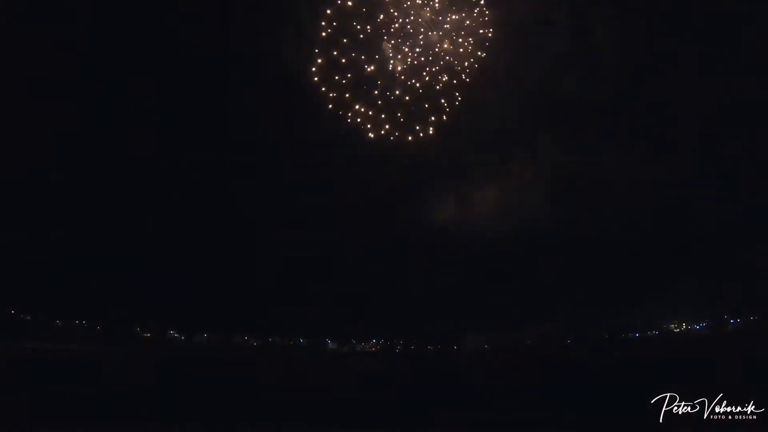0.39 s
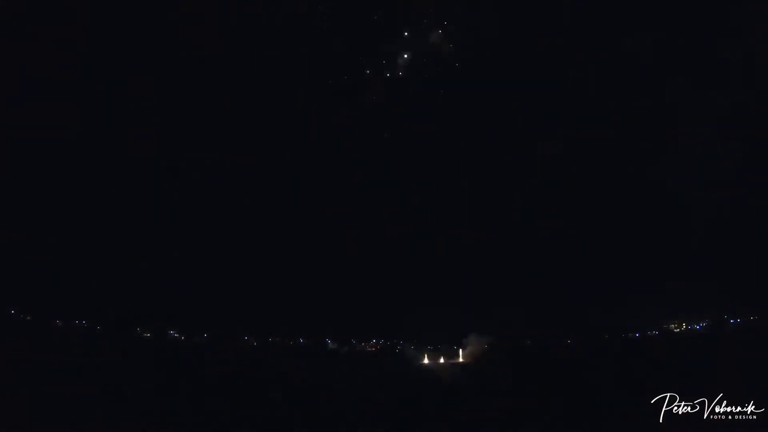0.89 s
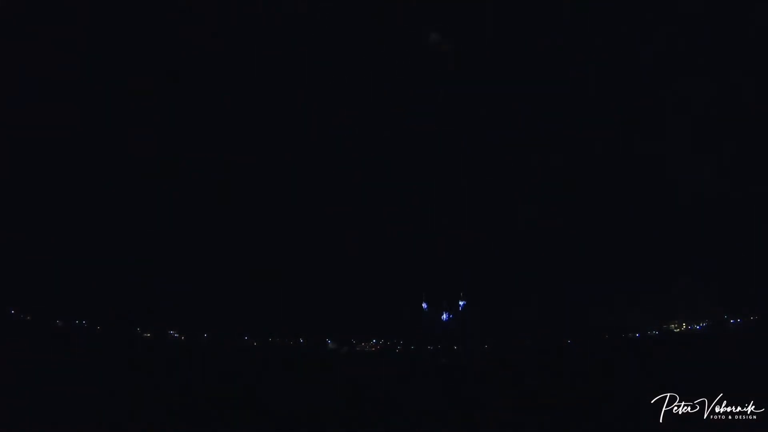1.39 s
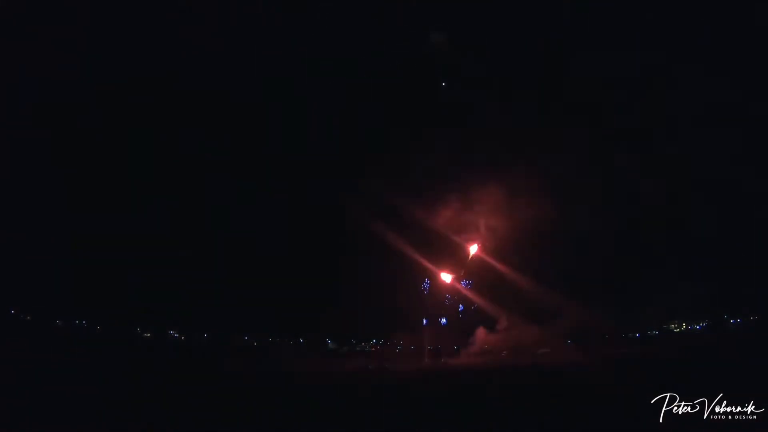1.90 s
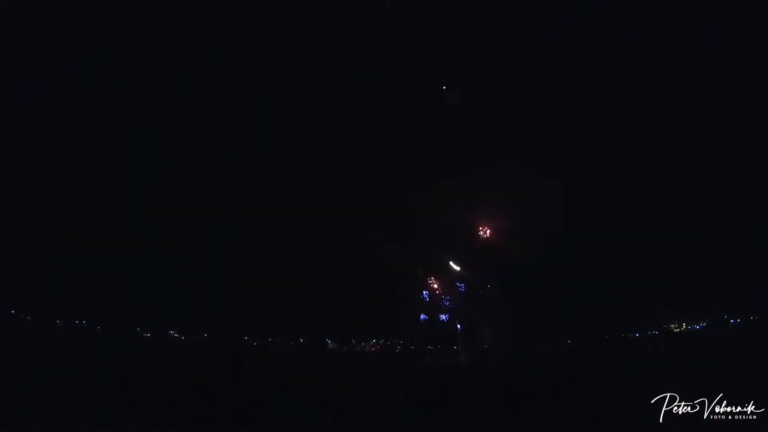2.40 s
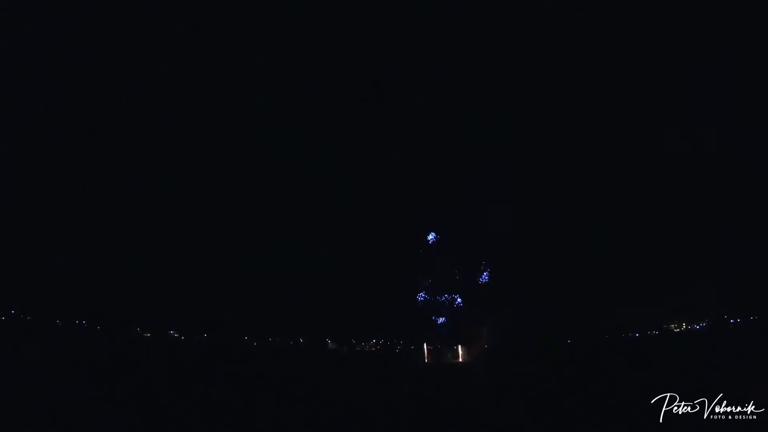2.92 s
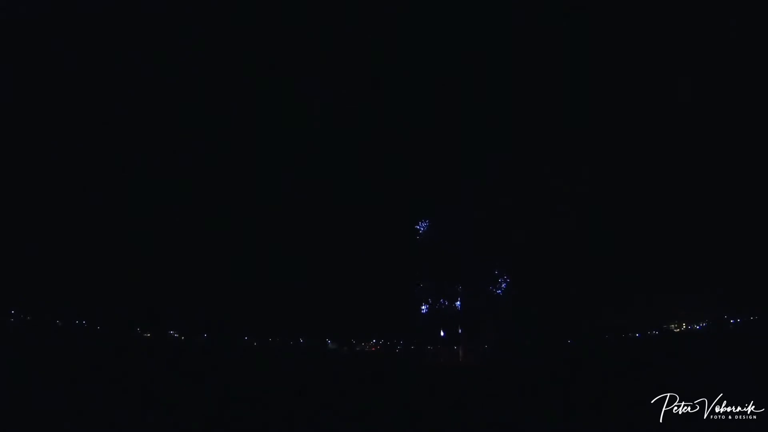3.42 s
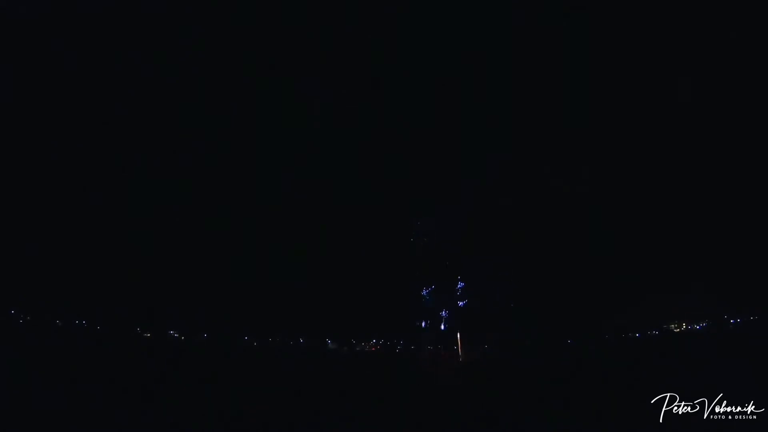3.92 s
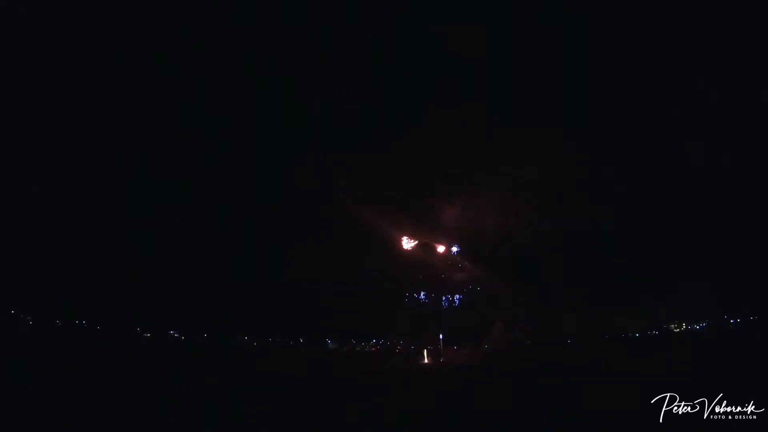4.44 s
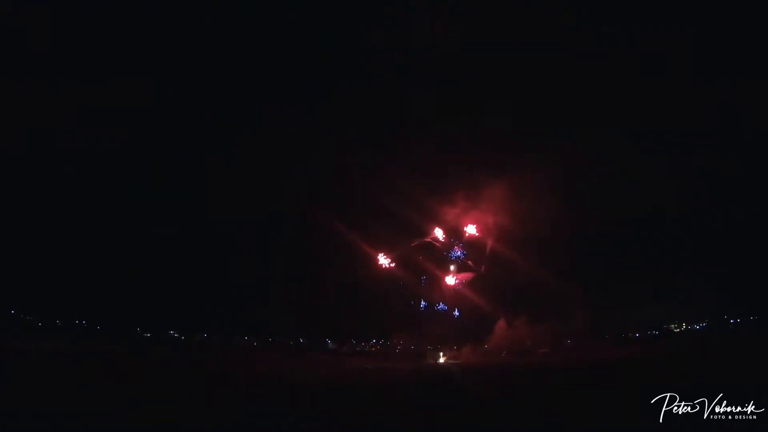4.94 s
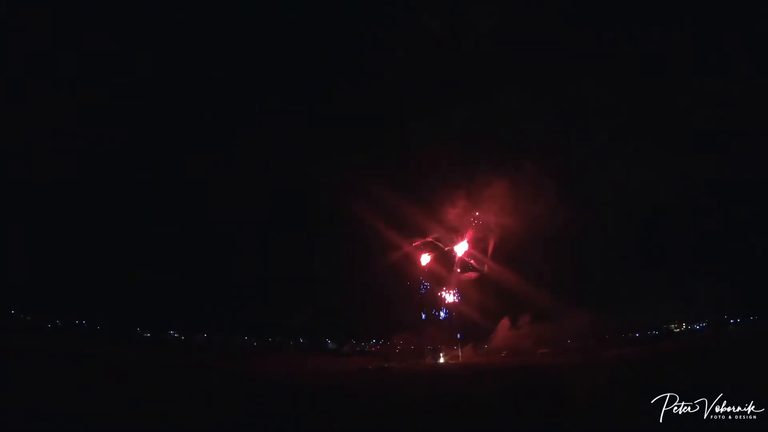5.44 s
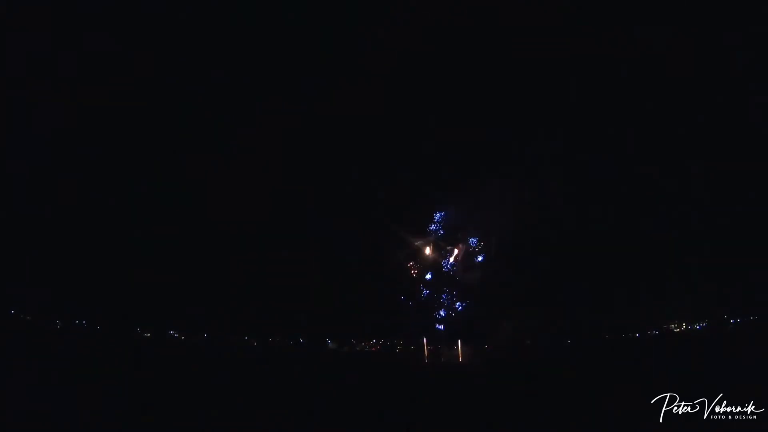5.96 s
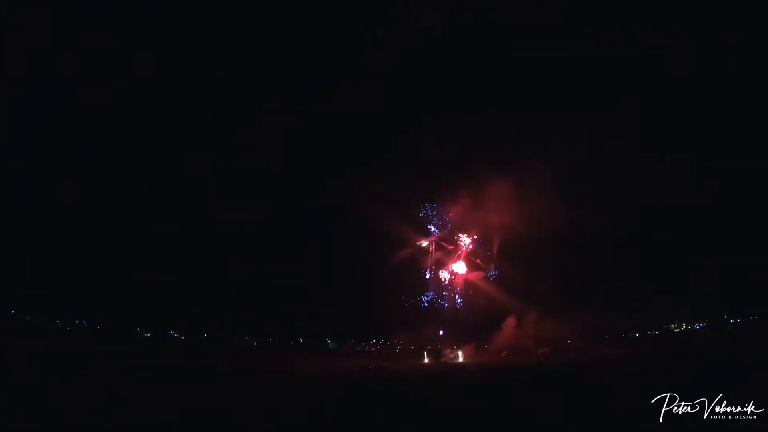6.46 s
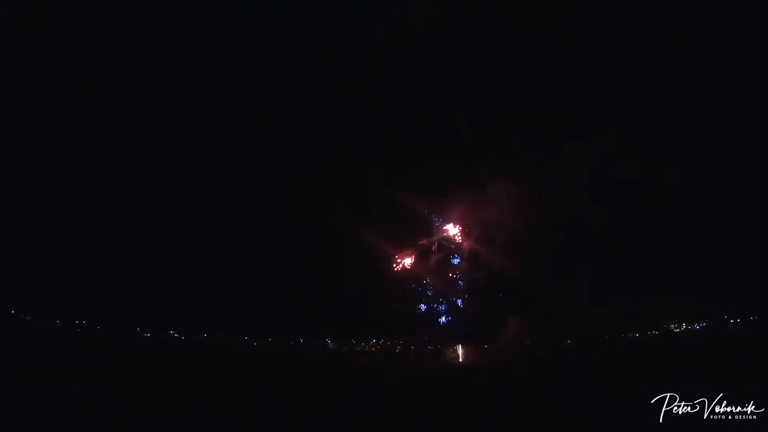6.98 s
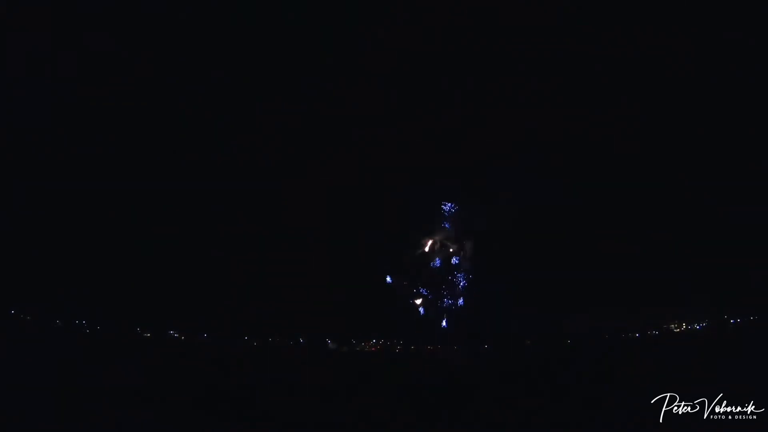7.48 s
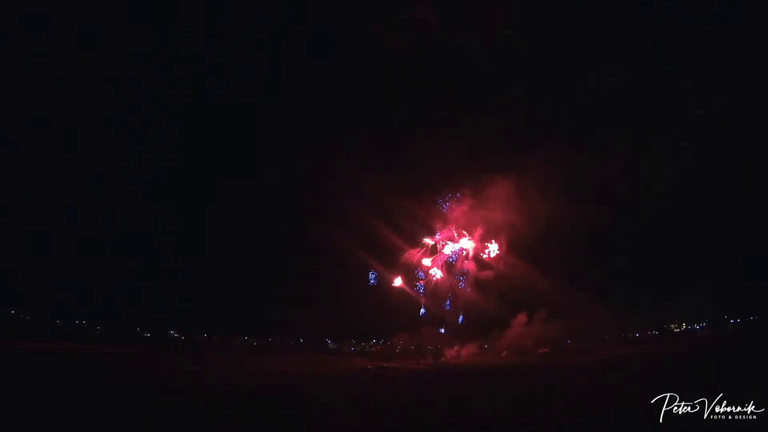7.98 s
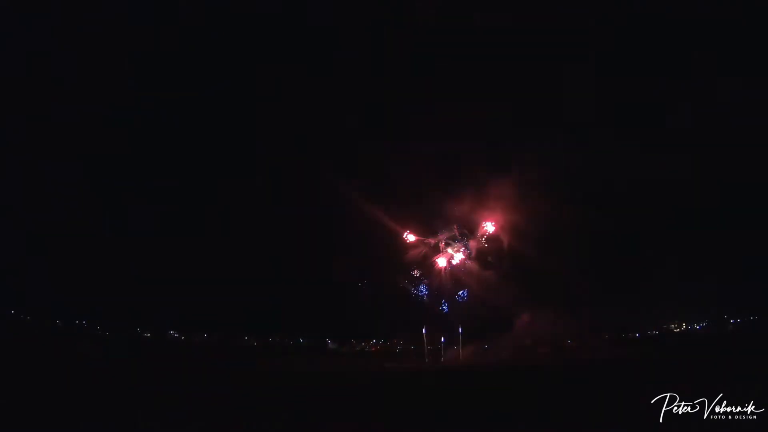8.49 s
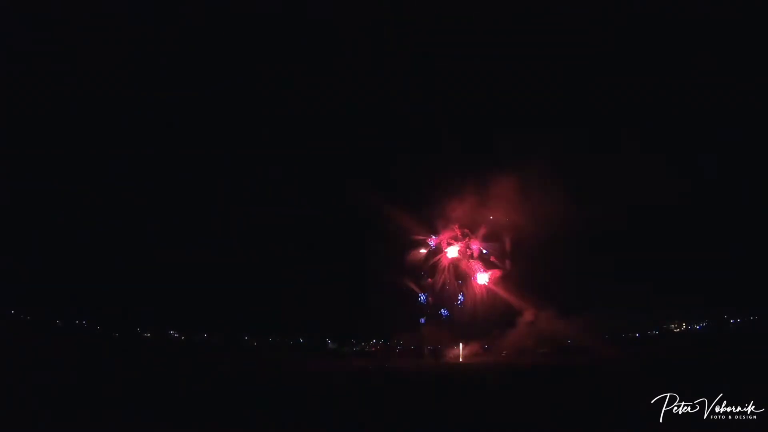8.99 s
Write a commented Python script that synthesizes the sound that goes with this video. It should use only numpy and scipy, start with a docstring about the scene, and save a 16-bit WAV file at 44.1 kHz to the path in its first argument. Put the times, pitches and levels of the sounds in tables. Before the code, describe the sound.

First a low rolling echo and muffled thuds, with small mechanical clicks nearby. Then a burst of hard, dry bangs breaks out, each a bright crack and short thump, slapping back from walls. The firing loosens briefly, then thickens with heavier high bursts toward the end. A continuous rumble and rough crackle fill the open night air; the display sits slightly right in stereo, peaks slightly rounded by the microphone.

```python
"""Fireworks heard across open ground at night: mortars lift and shells burst, several a second.
Each bang joins a sharp crack to a low thump; high bursts add a reflection off the ground.
Shaped noise and short pitched echoes make the crackling, rumbling wash that the town returns.
A small mechanism, likely a camera shutter, ticks as struck modes and whirs as banded noise close
to a stereo microphone; one short squeak is a gliding tone with two overtones."""
import sys
import numpy as np
from scipy import signal
from scipy.fft import rfft, irfft, next_fast_len
from scipy.io import wavfile
from scipy.ndimage import uniform_filter1d

SR = 44100
rng = np.random.default_rng(int(sys.argv[2]) if len(sys.argv) > 2 else 0)


def put_to_file(sound):
    """Save the sound as 16-bit audio at rate SR, in the file named by the first command-line argument."""
    columns = np.atleast_2d(sound).T  # one column per channel
    safe = np.clip(columns, -1, 1)
    whole_steps = np.round(safe * 32767)
    wavfile.write(sys.argv[1], SR, whole_steps.astype(np.int16))


def elevation(decibels):
    """Turn decibel levels (scalar or array-like) into linear amplitude ratios."""
    levels = np.asarray(decibels, float)
    return 10 ** (levels / 20)


N = 402368


def evened(x):
    """Normalisation: scales to rms 1."""
    return x / np.sqrt(np.mean(x ** 2) + 1e-20)


def read(points, hz):
    """Interpolation: reads a table on a log-frequency axis."""
    f, value = np.transpose(points)
    return np.interp(np.log(hz + 1), np.log(f + 1), value)


def add(mix, s, sound):
    """Superposition: mixes a sound in from time s."""
    part = mix[..., round(s * SR):][..., :sound.shape[-1]]
    part += sound[..., :part.shape[-1]]


def coloured(x, points, share=1):
    """Linear filtering: multiplies the spectrum by a gain table."""
    n = next_fast_len(x.shape[-1] + 512)
    hz = np.arange(n // 2 + 1) * SR / n
    return irfft(rfft(x, n) * elevation(share * read(points, hz)), n)[..., :x.shape[-1]]


def sides(pan_db):
    """Level difference between channels: positive is louder on the left."""
    return elevation(np.array([[.5], [-.5]]) * pan_db)


# What never dies away, and far echoes of every bang: one value per range of the wash
# (rumble, hollow middle, crackle, sizzle)
TOWN_DB = (-46.5, -52, -89.5, -83)
MEMORY_DB, MEMORY_T60_S = (-37.5, -67.5, -42, -76.5), (2.65, 1.3, 2.8, 1.1)
# Great shell that burst earlier, echoed from ever farther and duller: (start_s, level_db, t60_s)
SHELL = [(0, -48.5, 5.6), (.21, -43.5, 2.7), (.3, -40, 1.3), (.41, -39.5, 0.81), (.48, -37, 1.37),
         (0.738, -40.5, 3.8), (.85, -42, 3.3), (1.04, -34, 1.1), (1.17, -40, 3.8), (1.5, -25, 1.08),
         (1.79, -40, 22)]
# Its level in each range: [db], and the change with start time
SHELL_DB = (6.5, 1, 0.5, -13.5)
SHELL_DULLS_DB_PER_S, SHELL_RISE_S = (-7.5, -4.5, -30, -85), 0.027
# Echoes of a whole volley rolling in from the town:
# (start_s, crackle_level_db, base_decay_s, sizzle_relative_to_crackle_db)
ROLLS = [(0, -48.5, 0.4, 4.5), (1.426, -25.5, 0.19, -5), (1.501, -35, 0.48, -11),
         (1.571, -37.5, 0.46, -8.5), (1.651, -34.5, 0.52, -15.5), (1.947, -45.5, 1, -44),
         (2.026, -32, 0.58, -12.5), (2.17, -35.5, 1, -15.5), (2.546, -38.5, 0.68, -11),
         (2.62, -43.5, 0.35, -10.5), (2.722, -37.5, 0.84, -13), (2.868, -42.5, 0.29, -17),
         (2.93, -38.5, 0.34, -33), (2.975, -36, 0.52, -22.5), (3.04, -33.5, 0.47, -14),
         (3.214, -40, 0.83, -14), (3.39, -33, 0.21, -8), (3.44, -27.5, 0.15, -5.5),
         (3.515, -39.5, 0.35, -14), (3.591, -42, 0.84, -5.5), (3.709, -34, 0.29, -8.5),
         (3.912, -45.5, 0.76, -20), (4.21, -35.5, 0.39, -6.5), (4.257, -33.5, 0.19, -34),
         (4.335, -34, 1, -14.5), (4.586, -34.5, 0.32, -25), (4.832, -36.5, 0.79, -12.5),
         (4.971, -37.5, 0.64, -9.5), (5.033, -26, 0.12, -11), (5.082, -29.5, 0.18, -13),
         (5.163, -40.5, 0.95, -13), (5.341, -45.5, 0.076, 2), (5.508, -36, 0.37, -11),
         (5.574, -40, 0.91, -9.5), (5.856, -38.5, 0.66, -11), (6.022, -36.5, 0.57, -12.5),
         (6.092, -24, 0.11, -24.5), (6.247, -37.5, 0.43, -10.5), (6.41, -33.5, 0.36, -11),
         (6.5, -42.5, 1, -14), (6.604, -47, 0.22, -3), (6.718, -34, 0.21, -21.5), (6.799, -35.5, 0.41, -12),
         (6.973, -41, 0.11, -5.5), (7.003, -30.5, 0.37, -5.5), (7.152, -35.5, 0.42, -13),
         (7.327, -44, 0.83, -20), (7.515, -42, 0.24, 5), (7.651, -32, 0.12, -8.5),
         (7.686, -32.5, 0.48, -16.5), (8.114, -41, 0.36, -5), (8.228, -35.5, 0.24, -10),
         (8.305, -37.5, 0.33, -7.5), (8.48, -40.5, 0.12, -11.5), (8.52, -34.5, 0.13, -24),
         (8.874, -32.5, 0.35, -8.5), (8.991, -45, 0.67, 0), (9.07, -34.5, 0.34, -31)]
# Rumble and middle against the crackle; factors on the base decay in each range
ROLL_DB, ROLL_LASTS = (5, -9), (0.97, 1.35, 1.234, 0.83)
FRONT_DB, FRONT_T60_S = 5.5, 0.016  # a roll opens with a bright front


def echo_levels():
    """Exponential decay: echoes in four ranges die away and add as powers; returns the gains."""
    t = np.arange(0, N + 32, 32) / SR

    def column(row):
        return np.array(row)[:, None]

    power = elevation(column(TOWN_DB)) ** 2 + 0 * t
    for start, db, t60 in SHELL:
        age = np.maximum(t - start + 1 / SR, 0)
        share_db = column(SHELL_DB) + start * column(SHELL_DULLS_DB_PER_S)
        rise = np.minimum(age / SHELL_RISE_S + (start == 0), 1)
        power = power + rise * elevation(db + share_db - 60 * age / t60) ** 2
    for start, db, decay, sizzle_db in ROLLS:
        age = np.maximum(t - start, 0)
        share_db = column((*ROLL_DB, 0, sizzle_db))
        fall_db = 60 * age / (decay * column(ROLL_LASTS))
        power = power + np.minimum(age / 0.0021, 1) ** 2 * elevation(db + share_db - fall_db) ** 2
        power[3] += (age > 0) * elevation(db + sizzle_db + FRONT_DB - 60 * age / FRONT_T60_S) ** 2
    for start, *_, thump_db, _, _ in reports():
        age = np.maximum(t - start, 0)
        level_db = thump_db + column(MEMORY_DB) - 60 * age / column(MEMORY_T60_S)
        power = power + np.minimum(age / 0.028, 1) * elevation(level_db) ** 2
    return [np.interp(np.arange(N) / SR, t, np.sqrt(p)) for p in power]


# Spectral shapes of the two upper ranges: (frequency_hz, gain_db)
CRACKLE = [(700, -5), (1300, 7), (2000, 11), (3600, 6.5), (4600, -6), (5600, -45.5), (7000, -58.5)]
SIZZLE = [(3500, -5.5), (4500, 1.5), (6500, -7.5), (8000, -17.5), (9500, -37.5)]
POPS_PER_S, POPS_DB = 300, -3  # small single echoes inside the crackle
SPITS_DB = -4  # their bright edges inside the sizzle


def pops():
    """Random impulses through resonances: echoes of a few milliseconds and rough pitch; a few are large."""
    t, out = np.arange(-300, 600) / SR, np.zeros((2, N))
    size = elevation(4.5 * np.minimum(rng.exponential(1, N), 3)) * (rng.random(N) < POPS_PER_S / SR)
    kind = rng.integers(0, 9, N)
    pitches = np.geomspace(900, 3900, num=9)
    for k, (hz, rough) in enumerate(zip(pitches, rng.standard_normal((9, len(t))))):
        waver = evened(uniform_filter1d(rough, size=30))
        swing = np.sin(2 * np.pi * hz * t + 1.26 * waver)
        echo = swing * np.exp(np.minimum(t / 0.00096, -t / 0.0028))
        out += signal.oaconvolve(size * (kind == k), echo)[:N] * sides(3.3 * rough[0])
    edges = signal.oaconvolve(size, rng.standard_normal(len(t)) * np.exp(-abs(t) / .0008))[:N]
    dull = elevation(POPS_DB) * evened(coloured(out, CRACKLE))
    bright = elevation(SPITS_DB) * evened(coloured(edges, SIZZLE))
    return dull, bright


# Spectral shapes of the two lower ranges: (frequency_hz, gain_db)
RUMBLE = [(15, -37), (25, -16), (82, 3.5), (119, -7.5), (210, 5), (353, -18), (450, -16.5), (580, -48.5),
          (990, -120)]
MIDDLE = [(250, -18), (450, 7), (900, 3.5), (1500, -2.5), (2300, -11.5), (3600, -34.5), (5000, -60.5)]
# Coherence of left and right: (frequency_hz, likeness [0 to 1])
SAME = [(60, 0.57), (180, 0.92), (550, 0.91), (1650, 0.47), (4970, 0.58), (15000, 0.12)]


def wash():
    """Diffuse field: noise for countless far echoes, in lumps that last longer in the lower ranges."""
    frames, hz = N // 128 + 5, np.fft.rfftfreq(512, 1 / SR)
    same, out = np.clip(read(SAME, hz), 0, 1)[:, None], 0
    # clumps of echoes that land in all ranges at once
    slaps = evened(uniform_filter1d(rng.exponential(1, frames) ** 2 - 2, size=4))
    levels = echo_levels()
    # old, faint echoes run together: the lumps flatten
    crackle_level = np.interp(np.arange(frames) * 128, np.arange(N), levels[2])
    fresh = np.clip(3.9 + np.log10(crackle_level) * 1.3, .2, 1)
    colours = (RUMBLE, MIDDLE, CRACKLE, SIZZLE)
    lump_frames = (8, 5, 3, 3)
    lumpiness_db, slaps_db = (3.5, 2.8, 3.3, 3.6), (1.1, 1.6, 2.2, 2.4)
    for level, colour, lump, lumpy_db, slap_db in zip(levels, colours, lump_frames, lumpiness_db, slaps_db):
        a, b, c, d, patches = rng.standard_normal((frames, 257, 5)).T
        patches = uniform_filter1d(patches, size=8, axis=0)  # across frequency
        patches = evened(uniform_filter1d(patches, size=lump, axis=1))  # along time
        left = a + 1j * b
        right = same * left + np.sqrt(1 - same ** 2) * (c + 1j * d)
        z = np.array([left, right])
        lumps_db = fresh * (lumpy_db * patches + slap_db * np.minimum(slaps, 2))
        z *= elevation(read(colour, hz)[:, None] + lumps_db)
        noise = evened(signal.istft(z, nperseg=512, noverlap=384)[1][:, :N])
        out = out + noise * level
    dull, bright = pops()
    return out + fresh[np.arange(N) // 128] * (levels[2] * dull + levels[3] * bright)


# Short ringing echoes, as from fences or stepped walls:
# (peak_s, level_db, pitch_hz, half_length_s [peak to 1/e])
PINGS = [(0.43, -34, 864, 0.0059), (0.493, -32, 924, 0.0089), (0.522, -33.5, 710, 0.0057),
         (0.903, -30, 710, 0.0023), (1.066, -34.5, 1410, 0.0037), (1.077, -29, 630, 0.0037),
         (1.559, -29.5, 685, 0.012), (1.803, -29, 654, 0.0055), (1.851, -25.5, 695, 0.003),
         (1.968, -37, 2760, 0.015), (2.02, -31.5, 2090, .005), (8.829, -39.5, 490, 0.0049)]


def pings():
    """Repetition pitch: a few unsteady cycles at one frequency swell and fade."""
    out, t = np.zeros(N), np.arange(-2500, 2500) / SR
    waver = evened(uniform_filter1d(rng.standard_normal((len(PINGS), 2, len(t))), size=120))
    for (s, db, hz, half), (a, b) in zip(PINGS, waver):
        tone = (1 + 0.3 * a) * np.sin(2 * np.pi * hz * t + 0.45 * b)
        add(out, s + t[0], elevation(db) * tone * np.exp(-(t / half) ** 2))
    return out


# Nearby scatter: (frequency_hz, t60_s)
NEAR = [(100, 0.17), (300, 0.13), (700, 0.23), (1800, 0.17), (5000, 0.056), (9000, 0.074)]


def scatter(x):
    """Multiple scattering: sparse taps of random sign, each band dying at its own speed."""
    taps = np.zeros((2, 22000))
    at = np.arange(200, 21900, 20) + rng.integers(0, 20, (2, 1085))
    np.put_along_axis(taps, at, rng.choice([-1., 1.], at.shape), 1)
    hz, t, z = signal.stft(taps, SR, nperseg=256)
    tail = signal.istft(z * elevation(-60 * t / read(NEAR, hz)[:, None]), SR, nperseg=256)[1]
    return signal.fftconvolve(x, tail / np.linalg.norm(tail[0]), axes=1)[:, :N]


# One squeak: (start_s, end_s, first_pitch_hz, last_pitch_hz, level_db)
SQUEAK = (.08, .114, 1730, 1680, -40)


def squeak():
    """Harmonic series: a gliding fundamental carries two weaker overtones."""
    start, end, first_hz, last_hz, db = SQUEAK
    turns = np.cumsum(np.linspace(first_hz, last_hz, round((end - start) * SR))) / SR
    tone = 0
    for k, g_db in enumerate((0, -3, -16)):
        tone = tone + elevation(g_db) * np.sin(2 * np.pi * (k + 1) * turns)
    return start, elevation(db) * tone * signal.windows.tukey(len(tone), .4)


# Knocks of the mechanism: (start_s, nominal_level_db, left_right_db, body_relative_to_treble_db)
TICKS = [(0.49, -57, -10, -20), (0.575, -56, -30, -19), (0.595, -55, -25, -10), (0.836, -52, 8, -8),
         (0.8501, -40.5, 11, 5), (0.907, -47, 23, 6), (1.009, -32, -2.5, 3), (1.058, -44, 7, 11),
         (1.0986, -44, 15, 22), (1.3885, -22, -4.5, 2), (1.396, -32.5, -20.5, 14.5), (1.4112, -24, -6, 0),
         (3.505, -35, -9, -9), (3.5428, -33, -8, 0), (3.6105, -35.5, -12, 10), (3.649, -35, -15, 3),
         (3.66, -41.5, -16, 20), (3.688, -37.5, -11, 11), (4.173, -43, -7, 4), (5.592, -24.5, -8.5, -10),
         (5.6005, -27, -8, -1), (5.6163, -24.5, -4, 8), (7.342, -43, -16, -5), (7.3802, -41, -16, -10),
         (7.466, -27.5, -7.5, -7), (7.505, -33, -3, -22), (7.512, -31, -15.5, -14), (8.996, -28.5, 1, 1),
         (9.007, -34, -15, -5), (9.014, -24, -7, 10), (9.0306, -26, -7, -11), (9.108, -41, -12.5, 4),
         (9.1146, -28, -7, 2)]
# Modes of the housing, low body and high edge: (frequency_hz, gain_db, t60_s)
TICK_BODY = [(2000, -4.5, 0.021), (2500, 2.5, 0.014), (3730, 3.5, 0.0065)]
TICK_EDGE = [(5400, 8.5, 0.0085), (6000, 5.5, 0.013), (7540, 19.5, 0.0026), (8100, 16.5, 0.0025),
             (8100, -7.5, 0.029)]
# Whir between ticks: (start_s, end_s, level_db, left_right_db)
WHIRS = [(0.84, 0.93, -64, 3), (0.963, 1.032, -55, 11), (1.095, 1.12, -52, 3), (1.371, 1.427, -44.5, -9),
         (3.22, 3.399, -56.5, 5), (3.503, 3.707, -57.5, -2), (5.597, 5.611, -45, -8),
         (7.33, 7.405, -52.5, -7), (7.45, 7.551, -47.5, -8), (7.874, 7.934, -52.5, -1),
         (8.984, 9.045, -45, -9)]
# Spectral shape of the whir: (frequency_hz, gain_db)
WHIR = [(3500, 5.5), (5200, -0.5), (8000, 3.5), (9500, -12), (11000, -52)]


def shutter():
    """Modal excitation: parts knock and chatter, ringing one housing a little differently each time; noise whirs."""
    out, t = np.zeros((2, N)), np.arange(900) / SR
    luck = rng.standard_normal((len(TICKS), 8 + 300))
    for (s, db, pan_db, body_db), r in zip(TICKS, luck):
        modes = [(f, g + body_db, t60) for f, g, t60 in TICK_BODY] + TICK_EDGE
        ring = 0
        for k, (f, g, t60) in enumerate(modes):
            ring = ring + elevation(g + 3.0 * r[k] - 60 * t / t60) * np.sin(2 * np.pi * f * t)
        ring *= np.minimum(t / .0004, 1)  # a soft start
        chatter = r[8:] * np.exp(-t[:300] / 0.002)
        ring = elevation(db - 10.0) * np.convolve(ring, chatter / np.linalg.norm(chatter))
        add(out, s - .001, sides(pan_db) * [np.roll(ring, 3), ring])  # left lags by 3 samples
    for start, end, db, pan_db in WHIRS:
        hiss = evened(coloured(rng.standard_normal((2, 9000)), WHIR))[:, :round((end - start) * SR)]
        add(out, start, elevation(db) * sides(pan_db) * hiss * signal.windows.tukey(hiss.shape[1], .3))
    return out


BLUNT_DB = -19.5  # cracks fainter than this have lost their shock


def crack(t, hz, db, bright_db, noise, smear=0):
    """Shock wave: a push and deep suction, a thin bright front, a ragged wake; echoes smear, faint ones are all wake."""
    sharp = np.clip((db - BLUNT_DB) / 10, 0, 1)
    shock_shape = np.exp(-.5 * (t * hz / (0.25 + 0.42 * smear)) ** 2)
    shock = -np.cos(2 * np.pi * hz * t + .5) * shock_shape
    front = -elevation(bright_db - 12.5) * np.cos(2 * np.pi * 6500 * t) * np.exp(-.5 * (t / .00006) ** 2)
    band = signal.butter(2, [0.797 * hz, 1.051 * hz], "band", fs=SR)
    ragged = evened(signal.lfilter(*band, noise))
    ragged = ragged + np.clip((bright_db + 57.5) / 30, .1, 1.3) * (1 - 0.48 * smear) * noise
    echo_band = signal.butter(2, [1200, 4200], "band", fs=SR)
    ragged = ragged + 0.34 * smear * evened(signal.lfilter(*echo_band, noise[::-1]))
    rise = np.exp(np.minimum(t, 0) / (.0007 + .0008 * smear))
    after = np.maximum(t, 0)
    wake = ragged * rise * (np.exp(-after / 0.0042) + 0.089 * smear * np.exp(-(after / 0.023) ** 2))
    return sharp * (shock + front) + elevation(-7.0 - 10.46 * sharp) * wake


def thump(t, hz, height):
    """Blast wave: swings slow down as they die, quicker to start and longer from high up."""
    start = .0008 - .0005 * height
    turns = np.maximum(t - start, 0) * hz
    swing = np.sin(2 * np.pi * 1.172 * turns ** (0.73 + 0.078 * height))
    wave = swing * turns ** (1.3 - 1.0 * height)
    wave = wave * np.exp(-(1.1 - 0.97 * height) * turns ** 2.9)
    return wave / abs(wave).max()


def punch(t, hz=680):
    """Pressure pulse: the steep shoulder of a high burst in one quick swing."""
    return np.sin(2 * np.pi * hz * (t - .0003)) * np.exp(-.5 * ((t - .0003) * hz / 0.53) ** 2)


# Mortars firing on the ground: (start_s, crack_level_db, crack_hz, thump_level_db, nominal_thump_hz)
LIFTS = [(1.427, -6.5, 2140, -18, 215), (1.442, -2.5, 2700, -6.5, 198), (1.4558, -3, 3100, -9.5, 194),
         (1.463, -8.5, 3000, -9.5, 172), (1.589, -24, 2460, -22.5, 164), (2.032, -35, 1860, -23, 248),
         (2.052, -17, 1570, -32.5, 127), (2.0698, -9.5, 1630, -24, 177), (2.0871, -5, 2700, -6.5, 193),
         (2.171, -11.5, 2500, -25, 124), (2.2579, -18.5, 2560, -28.5, 154), (2.3994, -14.5, 2080, -31, 158),
         (2.5777, -2.5, 2250, -8.5, 178), (2.5834, -12, 1830, -20.5, 120), (2.7651, -10, 1510, -19, 175),
         (2.774, -13, 1900, -30.5, 151), (3.0409, -23, 2150, -21.5, 152), (3.218, -13.5, 2520, -20, 140),
         (3.45, -7, 1950, -16, 157), (3.709, -17, 2380, -37.5, 235), (3.7189, -6.5, 3150, -7, 183),
         (3.771, -3, 2280, -10, 202), (4.2247, -7, 2960, -14, 168), (4.2638, -19, 1880, -32, 241),
         (4.397, -14.5, 1730, -31, 240), (4.617, -11.5, 2320, -36, 157), (4.8619, -9, 1430, -14.5, 189),
         (4.868, -11.5, 2580, -16, 112.6), (4.9017, -10.5, 2230, -21, 214),
         (4.9971, -12.5, 2010, -17.5, 134), (5.034, -28, 2150, -23.5, 205), (5.0499, -10.5, 1510, -26, 148),
         (5.088, -16, 1450, -35, 212), (5.0975, -13.5, 2500, -24, 220), (5.542, -3.5, 2170, -10, 172),
         (5.548, -13.5, 2900, -19, 119), (5.6595, -3, 2300, -12, 163), (6.0184, -12.5, 2100, -17, 174),
         (6.0585, -13, 2310, -22, 210), (6.2907, -14.5, 1810, -26.5, 194), (6.4561, -7, 2500, -14, 186),
         (6.468, -17.5, 1620, -37, 200), (6.839, -17, 2140, -31, 240), (7.029, -3, 2120, -6, 224),
         (7.1554, -7.5, 2500, -12.5, 159), (7.204, -20.5, 2280, -21, 168), (7.5194, -5, 1280, -3, 217),
         (7.6896, -6.5, 2900, -8, 182), (8.0486, -13, 3320, -13, 216), (8.3093, -6.5, 2900, -14, 158),
         (8.8795, -17.5, 3250, -24, 236), (8.899, -4, 2950, -15, 168), (8.9294, -12.5, 1590, -26.5, 216)]
LIFT_BRIGHT_DB, BRIGHT_PER_DB = 6.5, 3.5  # a stronger blast has a brighter shock front
# Shells bursting high up: (start_s, crack_level_db, crack_hz, thump_level_db, nominal_brightness_db)
BURSTS = [(1.5092, -22, 1690, -30, -36), (2.111, -19.5, 1600, -29, -38), (2.2314, -5, 1970, -15.5, -6),
          (5.1234, -14.5, 1370, -21.5, -21), (5.1325, -2, 1640, -10.5, -9), (5.579, -5.5, 1496, -16, -13),
          (5.7171, -6, 1750, -13.5, -34), (5.9679, -10.5, 1530, -21.5, -33),
          (6.084, -3.5, 2017, -11.5, -25), (6.1015, -7, 1490, -9, -66), (6.4954, -3, 2360, -9.5, -40),
          (6.512, -7.5, 1560, -17, -11), (7.0445, -6, 1270, -5.5, -32), (7.12, -7.5, 1960, -15.5, -23),
          (7.5443, -6, 1630, -11, -10), (7.7274, -3, 1780, -10.5, -19.5), (8.063, -2, 1680, -9.5, -25.5),
          (8.1289, -10, 1990, -17.5, -20), (8.141, -5, 1740, -7.5, -36), (8.33, -3.5, 1500, -12.5, -29.5),
          (8.5429, -6, 1590, -16.5, -8), (9.0719, -4, 1370, -11, -29.5)]
BURST_THUMP_HZ = 292.5  # nominal; varies from shell to shell
# Cracks thrown back by walls, nearly without thump: (start_s, level_db, crack_hz)
SLAPS = [(1.48, -15, 1620), (1.6352, -26, 2880), (1.654, -29, 2980), (1.688, -22, 2400), (1.718, -23, 2360),
         (1.701, -10, 2360), (1.7045, -16.5, 2100), (2.124, -16, 1680), (2.2, -30, 2400),
         (2.691, -30, 2000), (2.29, -13, 2500), (2.631, -20, 1536), (2.71, -27, 2300), (2.8068, -17, 1910),
         (2.869, -22.5, 4230), (3.0828, -16.5, 2000), (3.157, -28, 2100), (3.527, -21.5, 2090),
         (3.489, -14, 1760), (3.7917, -15, 1630), (3.8108, -21, 1660), (3.921, -25.5, 2120),
         (3.995, -29.5, 2000), (4.0314, -11.5, 2320), (4.048, -31, 2390), (4.058, -35, 2500),
         (4.219, -22, 2430), (4.27, -18.5, 2640), (4.3, -24, 2240), (4.436, -21.5, 1860),
         (4.446, -24, 3160), (4.5, -21.5, 2970), (4.632, -24, 2400), (4.925, -22, 2010), (4.937, -17, 1640),
         (4.972, -16.5, 1990), (5.0057, -13, 3400), (5.11, -24, 2350), (5.166, -22, 1580),
         (5.195, -26, 3860), (5.227, -25, 2170), (5.3456, -23.5, 2230), (5.6539, -21, 1540),
         (5.778, -25.5, 1490), (5.882, -14, 1850), (6.33, -26, 1630), (6.124, -25, 2300),
         (6.1284, -15, 1780), (5.898, -21.5, 1720), (6.362, -23.5, 1850), (6.535, -20, 1590),
         (6.609, -28, 1510), (6.715, -12.5, 2280), (6.883, -29, 1490), (6.977, -26.5, 3570),
         (7.032, -9.5, 2320), (7.0604, -25, 1580), (7.192, -26, 2000), (7.286, -26.5, 2000),
         (7.7044, -12.5, 1430), (8.172, -14.5, 1420), (8.269, -22, 1980), (8.349, -20.5, 1700),
         (8.484, -23, 3460), (8.959, -22.5, 1850), (9.009, -19, 1740)]
# Dull thuds with only a faint ragged wake for a crack: (start_s, level_db, nominal_thump_hz)
THUDS = [(0.229, -25, 142), (0.293, -21, 135), (0.304, -19.5, 131), (0.32, -21.5, 140), (0.4678, -24, 138),
         (0.583, -24, 129), (0.705, -26, 119), (0.72, -26, 117), (0.793, -26.5, 124), (1.657, -27.5, 170),
         (2.975, -27.5, 244), (3.244, -23, 135), (3.306, -27.5, 139), (3.406, -23, 142), (3.596, -24, 120),
         (3.954, -25.5, 134), (4.358, -23, 207), (4.408, -28.5, 159), (4.501, -24, 183), (4.59, -24.5, 278),
         (4.839, -20, 254), (5.199, -23.5, 139), (5.231, -22, 180), (6.005, -17, 182), (6.257, -24.5, 123),
         (6.4633, -20.5, 142), (6.611, -21, 149), (6.7285, -24, 274), (6.804, -24.5, 240),
         (6.979, -17, 141), (6.987, -16.5, 135), (7.014, -15, 139), (7.853, -19.5, 142),
         (8.119, -20.5, 227), (8.229, -21, 235), (8.376, -23.5, 199), (8.481, -28, 123),
         (9.024, -22.5, 161)]
SLAP_BRIGHT_DB = -51.5  # also for thuds


def reports():
    """Shock and blast parameters: (start_s, crack_db, crack_hz, thump_db, thump_hz, brightness_db) of all bangs."""
    rows = [(*row, LIFT_BRIGHT_DB + BRIGHT_PER_DB * row[1]) for row in LIFTS]
    for s, db, hz, thump_db, bright_db in BURSTS:
        rows.append((s, db, hz, thump_db, BURST_THUMP_HZ, bright_db))
    rows += [(s, db, hz, db - 34, 190, SLAP_BRIGHT_DB) for s, db, hz in SLAPS]
    rows += [(s, db - 15, 2000, db, hz, SLAP_BRIGHT_DB) for s, db, hz in THUDS]
    return rows


# Spectral shape of the noise behind a crack: (frequency_hz, gain_db)
WAKE = [(600, -0.5), (1300, -11.5), (3600, 3.5), (5000, -12.5), (7500, -25), (9500, -47.5)]


def bangs():
    """Direct sound and ground reflection: high bursts add a crack off the ground, a little later to the left."""
    out, t = np.zeros((2, N)), np.arange(-300, 2200) / SR
    rows = reports()
    noise = evened(coloured(rng.standard_normal((len(rows), 2 * len(t))), WAKE)).reshape(-1, 2, len(t))
    for (s, db, hz, thump_db, thump_hz, bright_db), (a, b) in zip(rows, noise):
        smear = np.clip((db - thump_db - 6) / 10, 0, 1)  # a crack without its thump came by a wall
        direct = np.array([crack(t, hz, db, bright_db, n, smear) for n in (1.1 * a + 0.66 * b, a)])
        height = np.clip((thump_hz - 215) / 50, 0, 1)  # a higher thump pitch counts as higher up
        size = 1 + 0.07 * height * rng.standard_normal()  # no two shells are quite alike
        bounce = np.array([crack(t - lag, 0.91 * hz, db, -67, b) for lag in (.0038, .0031)])
        shoulders = elevation(-6.0) * (punch(t * size) + 0.97 * punch(t * size - .0031))
        blast = thump(t, thump_hz * size, height) + height * (elevation(-5.0) * bounce + shoulders)
        add(out, s + t[0], elevation(db) * direct + elevation(thump_db) * blast * sides(2.5 * a[0]))
    return out


# The display lies to the right: (frequency_hz, left_right_db)
SHADOW = [(60, 1.5), (130, 1.5), (290, 0), (640, -1.5), (1410, -8), (3100, -5), (6820, -1.5), (15000, 3.5)]


def head_shadow(x):
    """Diffraction: the level difference between left and right depends on frequency."""
    return np.array([coloured(x[0], SHADOW, 1 / 2), coloured(x[1], SHADOW, -1 / 2)])


def scene():
    """Superposition: the display and squeak pass the head shadow; the shutter is close by."""
    shots = bangs()
    display = shots + elevation(-21.0) * scatter(shots) + wash() + pings()
    add(display, *squeak())
    return head_shadow(display) + shutter()


def top_cut(x):
    """Nothing passes above the cut-off."""
    return signal.sosfilt(signal.butter(12, 16470, fs=SR, output="sos"), x)


def record(dry):
    """Saturation and high-pass response: a microphone rounds off the hardest peaks and drops the deepest bass."""
    rounded = 1.367 * np.tanh(dry / 1.437)
    bass_cut = signal.butter(3, 52, "high", fs=SR, output="sos")
    mix = signal.sosfilt(bass_cut, rounded)
    return top_cut(mix)


dry = scene()
out = record(dry)
put_to_file(out)
```